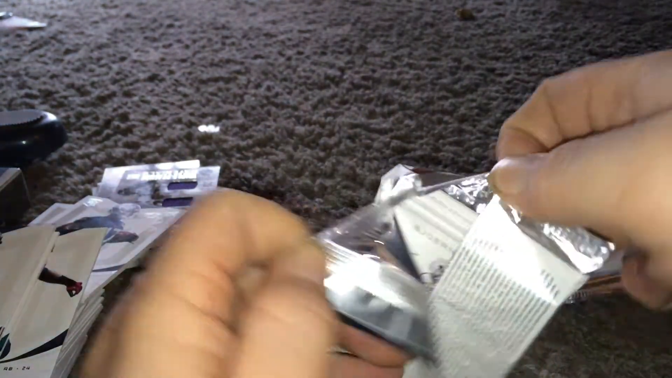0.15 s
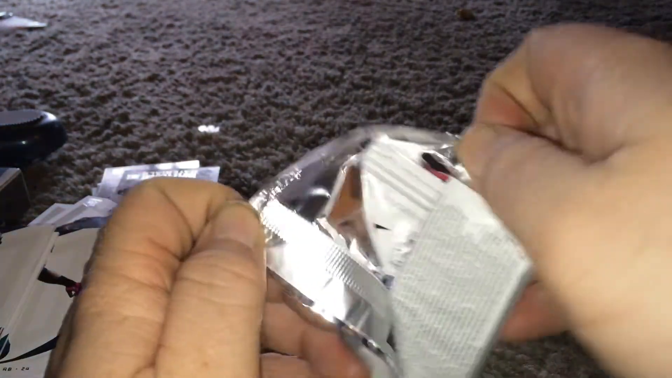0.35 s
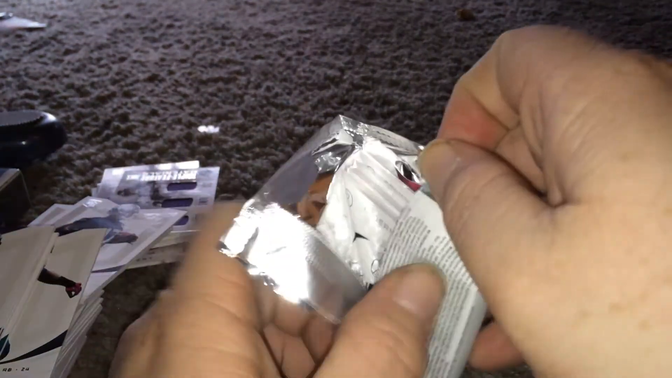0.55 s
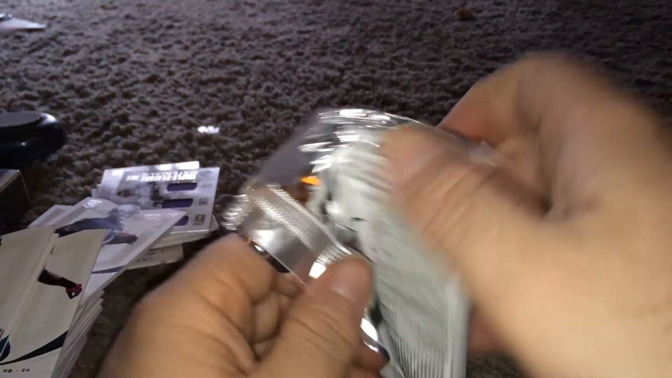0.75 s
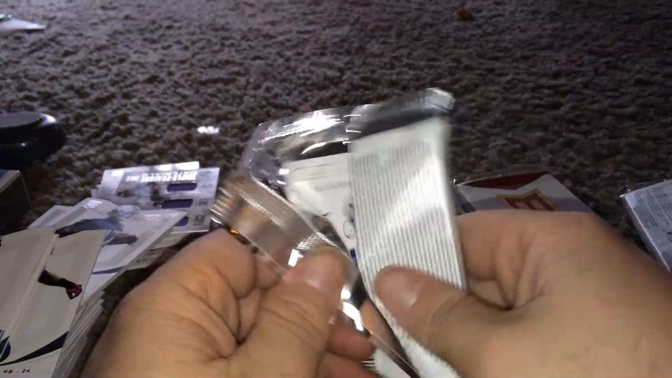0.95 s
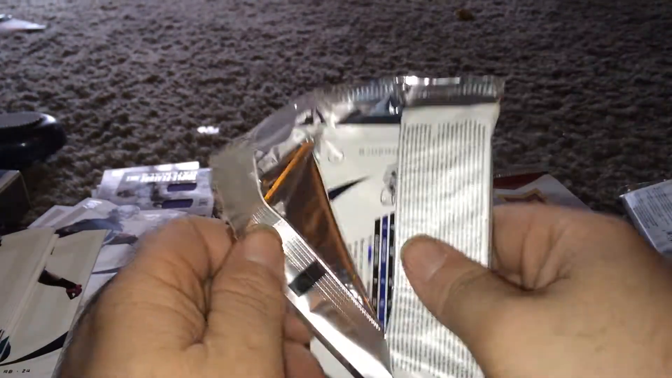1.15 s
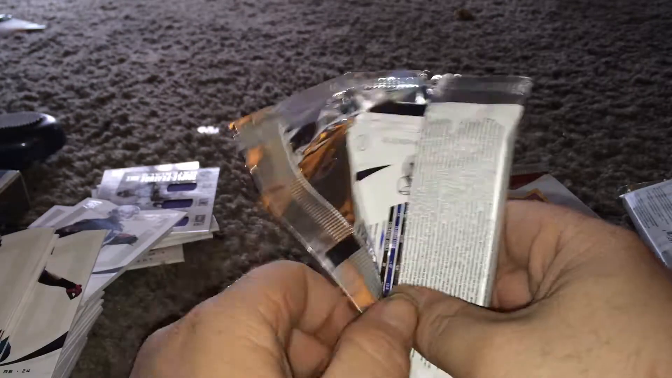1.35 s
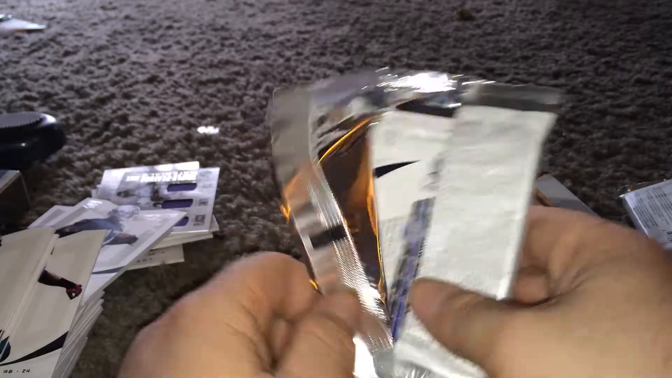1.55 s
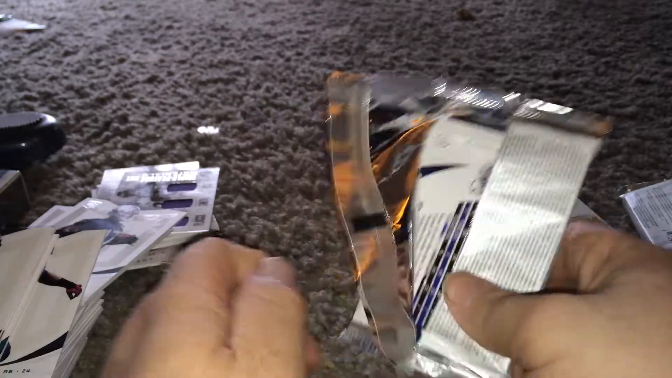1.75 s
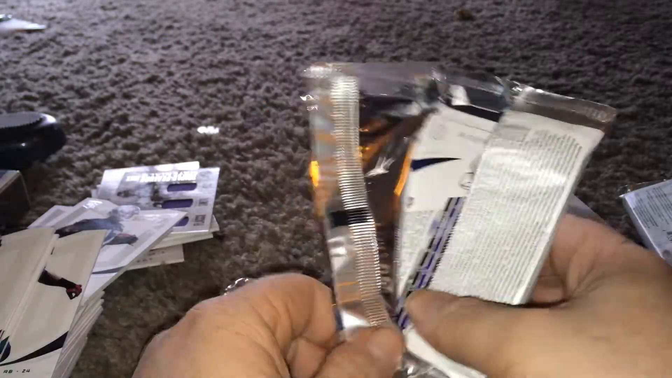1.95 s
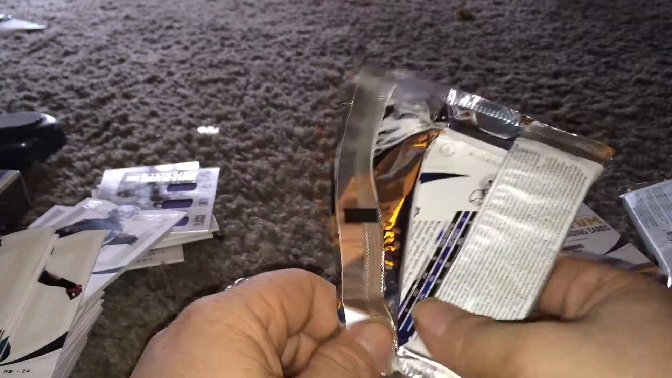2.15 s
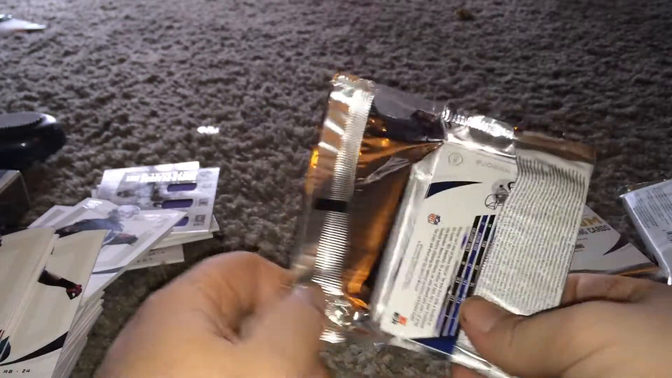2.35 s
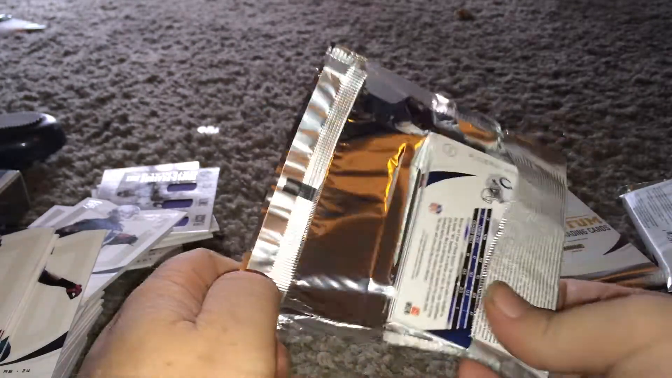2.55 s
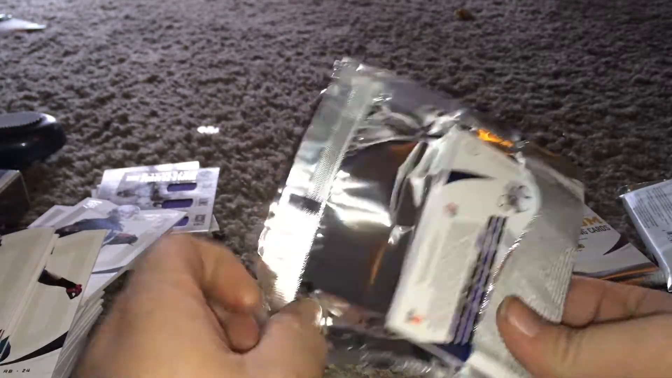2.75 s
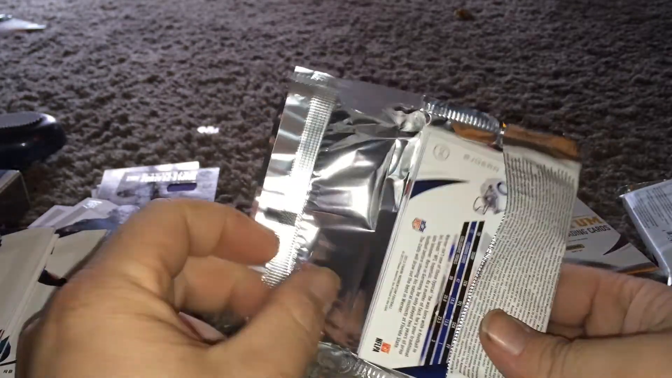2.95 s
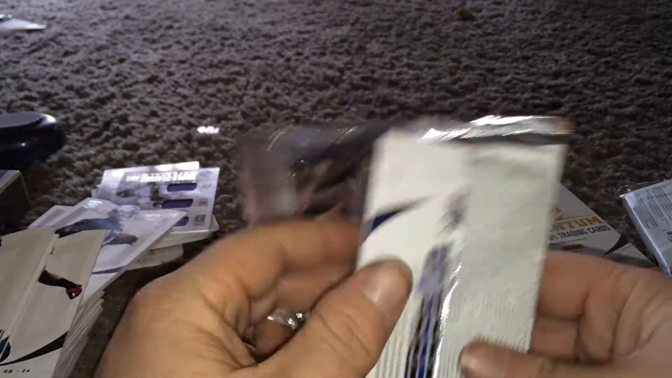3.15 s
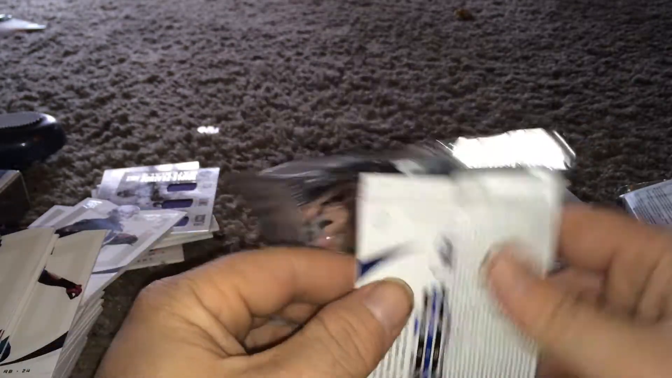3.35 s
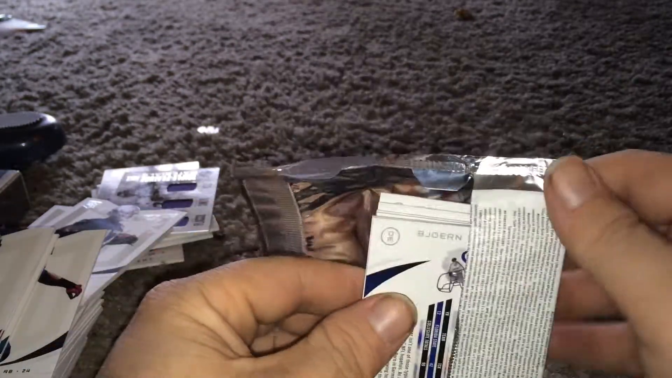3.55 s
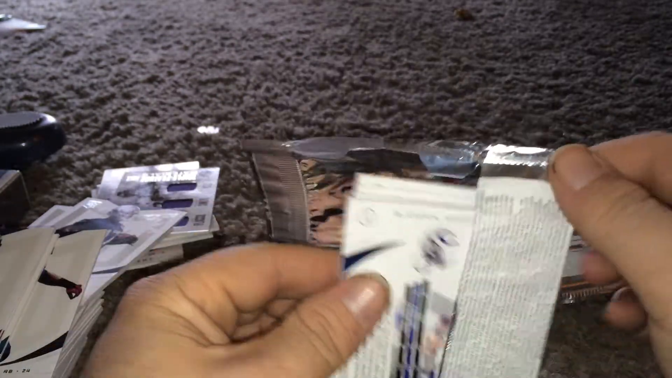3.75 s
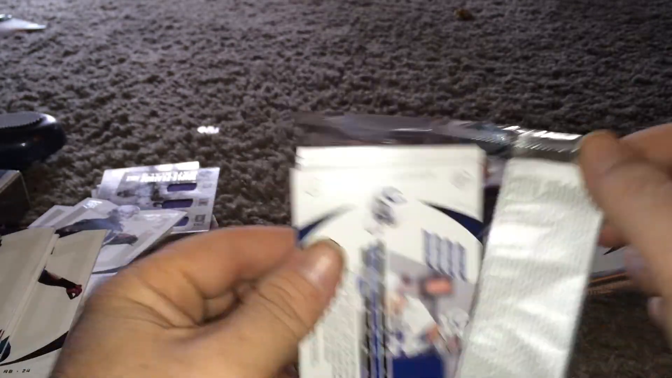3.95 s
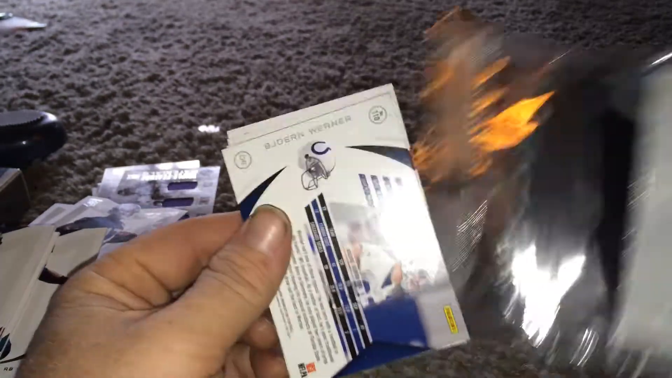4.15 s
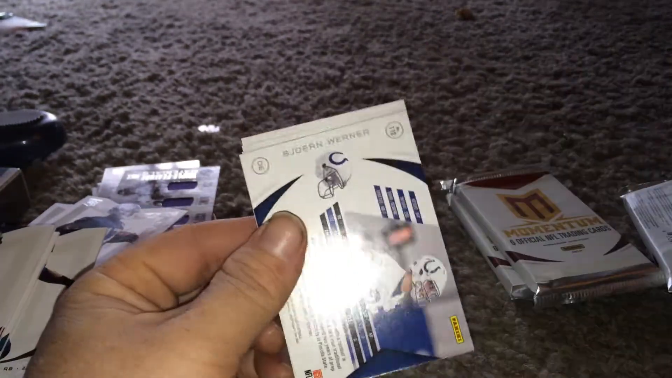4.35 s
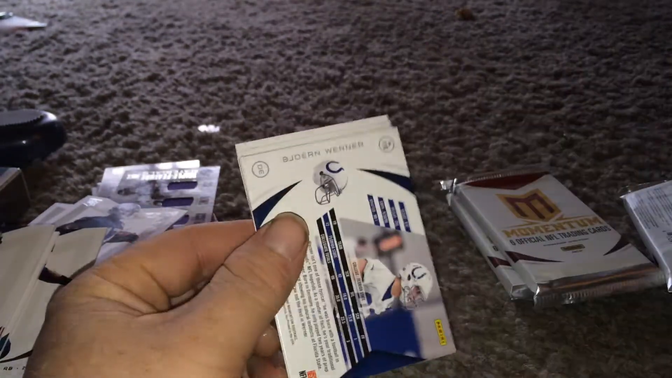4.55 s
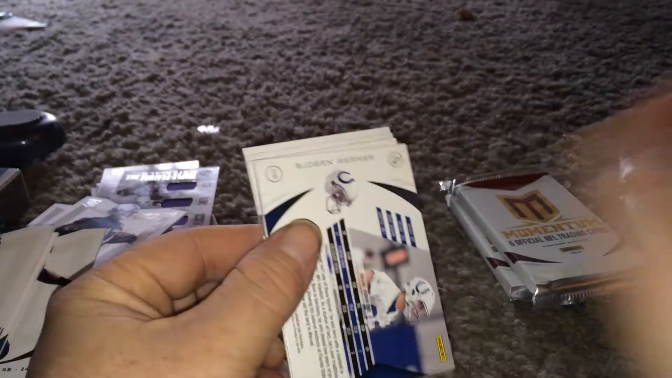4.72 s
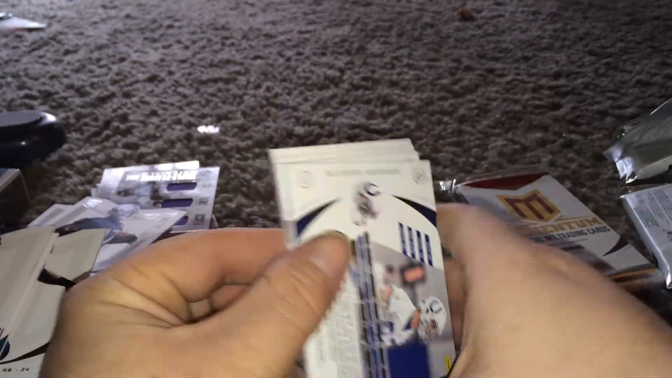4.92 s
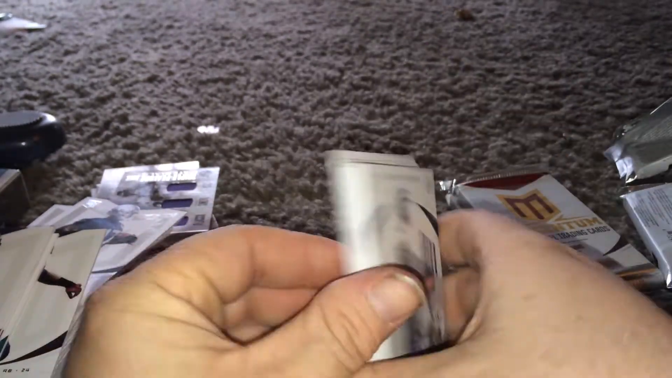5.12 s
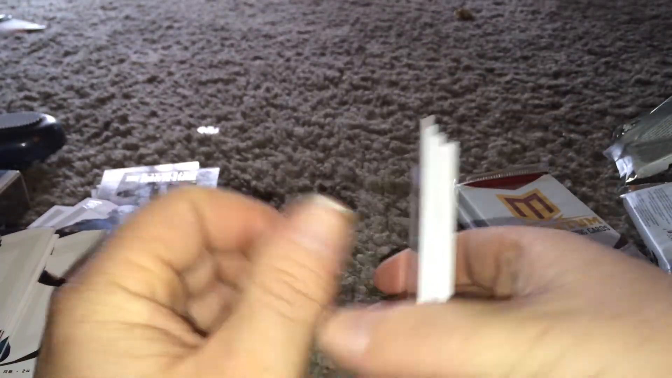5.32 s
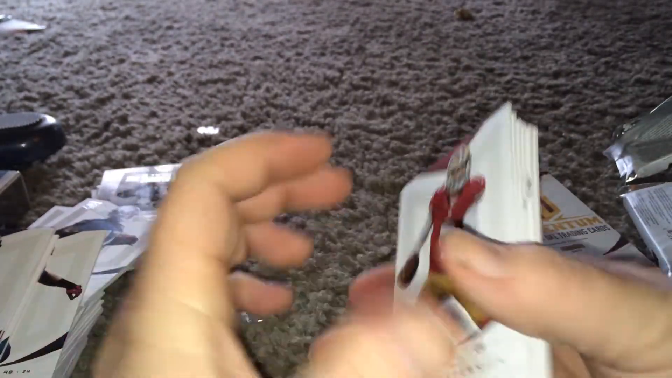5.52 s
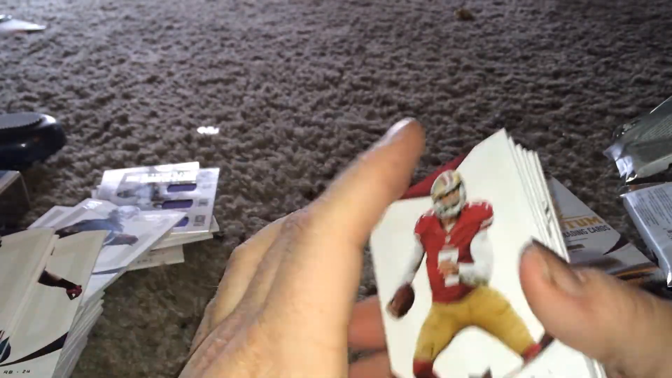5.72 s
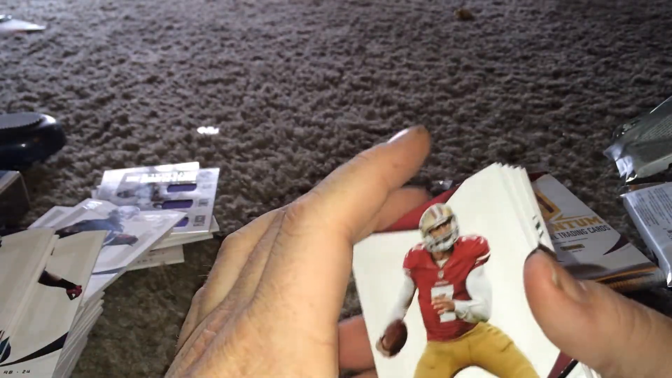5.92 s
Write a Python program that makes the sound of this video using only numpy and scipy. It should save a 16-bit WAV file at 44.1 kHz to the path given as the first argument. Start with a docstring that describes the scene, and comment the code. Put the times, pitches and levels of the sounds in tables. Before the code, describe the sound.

Crisp foil wrapper crackles and pops in busy bursts under working fingers, with one dull knock, then faint card sliding and a soft tap.

```python
"""In a quiet carpeted room, a foil card pack is peeled open along its seam by hand, close to the microphone.
Creases snap through one by one: short noise bursts ring the facet, the sheet and the sharp ridge.
Under them tiny folds crackle and surfaces hiss, shaped by strokes of the fingers; the sheet puffs air.
A dull knock falls midway; later the cards slide with a soft hiss and tap once. Knock and tap are fading tones.
Air noise, a low rumble and a wavering hum lie beneath; a short diffuse echo follows the hands."""
import sys
import numpy as np
from scipy import signal
from scipy.fft import rfft, irfft
from scipy.io import wavfile
from scipy.ndimage import uniform_filter1d

SR = 44100
rng = np.random.default_rng(int(sys.argv[2]) if len(sys.argv) > 2 else 0)


def bounce(signal):
    """Save signal as a 16-bit WAV file at the path given by the first command-line argument."""
    frames = np.transpose(np.atleast_2d(signal))
    limited = np.clip(frames, -1, 1)
    pcm = np.round(limited * 32767).astype(np.int16)
    wavfile.write(sys.argv[1], SR, pcm)


N = 268128

# spectrum of the room's air noise: (frequency [Hz], relative density [dB per Hz])
AIR_SPECTRUM = [(15, -56.5), (25, -25), (59, -1.5), (172, -2), (219, -3.5), (301, -0.5), (354, -22),
                (427, -16.5), (691, -18), (749, -18), (978, -18.5), (1420, -19), (2240, -25), (7090, -36.5),
                (15000, -35.5)]
# low resonances in the steady rumble: (frequency [Hz], width [Hz], relative level [dB])
RUMBLE_MODES = [(91, 30, -10.5), (156.5, 13.5, 3), (236, 12, -1.5), (322.6, 26, -3.5)]
AIR_DB, RUMBLE_DB = -54.5, -59  # RMS

# a low hum in the room that swells and fades: (time [s], level [dB])
HUM_LEVEL = [(0, -54), (.3, -55), (.6, -65), (.9, -49), (1.2, -51), (1.4, -59.5), (1.9, -55.5), (3.0, -59),
             (3.5, -55.5), (4.2, -58), (4.6, -57.5), (5.2, -59), (6.08, -56.5)]
# its tones: (centre frequency [Hz], relative level [dB])
HUM_TONES = [(169.3, 0), (94, -9)]

# strokes of the fingers on the foil, then on the cards, before the layer trims: (strongest time [s],
# swell [s], ease [s], rustle level [dB], sheet flex against rustle [dB], sharp crack against rustle [dB])
STROKES = [(0.0, 0.027, 0.013, -34, -20, 1), (0.131, 0.085, 0.0058, -36, -15, -8),
           (0.283, 0.075, 0.04, -28, -11, -4.5), (0.419, 0.036, 0.015, -39.5, -9, -8),
           (0.49, 0.05, 0.15, -47.5, -3.5, -2), (0.705, 0.064, 0.024, -33, -7, -2.5),
           (0.788, 0.065, 0.035, -39.5, -6.5, -5.5), (1.0, 0.044, 0.072, -38.5, -12, -2),
           (1.193, 0.12, 0.02, -26, -6, -1), (1.295, 0.022, 0.02, -45, -10, -4),
           (1.415, 0.091, 0.011, -44, -20, -1.5), (1.563, 0.074, 0.035, -47.5, 2, -5),
           (1.631, 0.028, 0.077, -29.5, -11, -4.5), (1.743, 0.17, 0.0042, -37.5, -3.5, -8),
           (2.021, 0.042, 0.023, -37, -10, -2), (2.147, 0.047, 0.092, -52.5, 5.5, -3),
           (2.346, 0.089, 0.029, -31.5, -12, -4.5), (2.501, 0.076, 0.032, -35.5, -0.5, -4.5),
           (2.56, 0.0086, 0.029, -37.5, 0, -12), (2.686, 0.071, 0.021, -45.5, 0, -14),
           (2.797, 0.035, 0.065, -39, -9, -3.5), (2.969, 0.099, 0.008, -40.5, -20, -1.5),
           (3.052, 0.035, 0.052, -38, -7, -5.5), (3.118, 0.015, 0.042, -34.5, -12, -6.5),
           (3.231, 0.034, 0.037, -43.5, -2, -3), (3.348, 0.02, 0.027, -43, -5.5, -4),
           (3.469, 0.015, 0.015, -45, -2, -3), (3.615, 0.17, 0.025, -44, -14, -1),
           (3.737, 0.041, 0.03, -45, -17, -5.5), (3.84, 0.011, 0.072, -48, -13, -5),
           (4.01, 0.065, 0.04, -48.5, -8, -3.5), (4.057, 0.008, 0.023, -36, -7.5, -9),
           (4.134, 0.012, 0.022, -54, 10, -21), (4.192, 0.016, 0.008, -43, 4, -1),
           (4.253, 0.034, 0.02, -45, -20, -6.5), (4.475, 0.012, 0.037, -41.5, -10, -5.5),
           (4.57, 0.028, 0.017, -54, -3, -6), (4.62, 0.27, 0.28, -61, -14, 1),
           (4.738, 0.015, 0.01, -55, -9, -1), (4.794, 0.0074, 0.077, -57.5, -0.5, -22.5),
           (5.213, 0.023, 0.039, -55, 0, -0.5), (5.842, 0.052, 0.039, -64, -8.5, -5),
           (5.925, 0.015, 0.047, -57, -5, -4), (6.064, 0.012, 0.025, -62, -1.5, -7)]
STROKE_ROUNDNESS = 2.04  # 2 = a bell curve, 1 = a peak
# faint rustle of the wrapper while merely held, before the layer trims: (time [s], level [dB])
HELD_RUSTLE = [(0, -55), (.6, -63), (.9, -58), (1.45, -55), (1.82, -62.5), (2.3, -53), (3.3, -58),
               (4.5, -57.5), (5.0, -74.5), (6.08, -73)]
HELD_FLEX_DB, HELD_CRACK_DB = -7, -5.5  # against the held rustle
# smooth sliding against the folds: (time [s], level [dB])
SLIDING = [(0, -36), (.7, -10), (1.1, -9), (1.65, -5), (2.0, 7), (2.35, -15), (3.1, -7), (3.5, -1),
           (4.3, -2.5), (6.08, 7.5)]
# the slack wrapper rings hollow once it is open: (time [s], level against the rustle [dB])
HOLLOW_LEVEL = [(0, -26.5), (1.7, -19), (2.4, -7.5), (3.1, -10.5), (3.5, -24), (4.15, -7), (4.6, -16),
                (5.0, -19.5)]
HOLLOW_HZ, HOLLOW_WIDTH_HZ = 1372, 1520
# harder work sets off more folds: rate at a middling level, and its dB of growth per dB of level
FOLDS_PER_S, MIDDLING_DB, FOLD_GROWTH = 1500, -46.5, .3
# ridges that flip: how many folds go to one flip, and its boost
FOLDS_PER_FLIP, FLIP_DB = 28, 10

# creases snapping through; flex and crack are against the snap, before the layer trims: (time [s],
# reference level over 3 ms [dB], facet pitch [Hz], sheet flex [dB], sharp crack [dB])
CREASES = [(0.0318, -29.5, 2020, -30, -16), (0.064, -37, 5000, -27, -3), (0.069, -31, 4030, -11, 2),
           (0.083, -45, 3800, -13, 2), (0.0907, -28, 3900, -23.5, -4), (0.1126, -33, 2080, -11, -14),
           (0.125, -16, 4240, -18, -5), (0.1336, -15.5, 7070, -43, -14), (0.1897, -41, 4100, -28, 0),
           (0.2633, -22, 5800, -15, -1), (0.2685, -26.5, 4000, -9.5, -15), (0.2794, -30, 6300, -13, 1),
           (0.2897, -35, 7260, -22, 11), (0.3097, -26.5, 4730, -2.5, 4), (0.3192, -28.5, 2380, -3.5, -18),
           (0.3428, -39, 3420, -22, -2), (0.3919, -28, 5700, -18, -0.5), (0.4004, -35, 3500, -6, -6),
           (0.4265, -29.5, 7300, -30, 1), (0.4532, -15.5, 4580, -14.5, -4), (0.4603, -24.5, 3400, -18, 0),
           (0.4708, -31, 3870, -19, 1), (0.5152, -41, 3820, -21, -8), (0.5578, -31.5, 2230, -14, -3),
           (0.5613, -30.5, 3800, -14, -2.5), (0.5664, -31, 3930, -24, -19), (0.5807, -35, 4830, -16, -3),
           (0.6584, -27, 1980, -33, -5), (0.6971, -25.5, 5130, -4.5, -12), (0.701, -29, 5670, -12, 1),
           (0.717, -19, 3160, -18.5, -20), (0.7763, -24, 5000, -22, -7.5), (0.792, -36, 3000, -7, -4),
           (0.8224, -29.5, 3840, -12, -7), (0.9503, -41.5, 5660, -12, -2), (0.995, -22, 5900, -21, -3),
           (1.0264, -25, 3900, -30, 5), (1.0546, -22.5, 5000, -32, -8), (1.0599, -26, 7000, -32, -8),
           (1.0654, -17.5, 6860, -39, -6), (1.0709, -25.5, 4900, -39, 2.5), (1.1039, -23.5, 6000, -16, 5.5),
           (1.1286, -20, 6600, -9.5, 2), (1.151, -22, 1670, -6.5, -4), (1.1649, -16, 6540, -16, 0.5),
           (1.183, -32, 6140, -23, -5), (1.1928, -29.5, 6600, -24.5, -8), (1.2034, -26, 6430, -24, -1),
           (1.2104, -21, 5960, -25, 3.5), (1.2176, -14, 5970, -24, -3), (1.2315, -33, 5400, -28, 2),
           (1.2625, -33.5, 4570, -6.5, -2), (1.2947, -25, 7460, -24, 2), (1.3055, -32, 4650, -13, -6),
           (1.3504, -48.5, 3920, 2, -4), (1.368, -39.5, 5500, -19.5, -2), (1.3837, -32.5, 4550, -31, -8),
           (1.4219, -23.5, 4800, -35, -6), (1.4354, -29, 3500, -29, -5), (1.5365, -18, 6600, -24, -6),
           (1.543, -29, 4130, -28, -2), (1.5507, -20.5, 4800, -8.5, -4), (1.5741, -28.5, 2900, -5, -5),
           (1.579, -38.5, 5500, -24, -14), (1.604, -23.5, 5600, -4, 3), (1.6103, -20, 7300, -22, 0.5),
           (1.6234, -25, 4400, -34, -1), (1.6418, -14.5, 6000, -25, -5), (1.6769, -28, 6800, -3, -8),
           (1.6814, -22.5, 2070, -5.5, -8), (1.6983, -22.5, 5300, -26, -7.5),
           (1.7385, -32.5, 3180, -3.5, -8), (1.7431, -25.5, 5900, -11, -2), (1.799, -50, 2000, -10, -2),
           (1.9232, -49.5, 1800, -2.5, -2), (1.954, -27, 4460, -15, 2), (1.96, -30.5, 5200, -11.5, 2),
           (1.9645, -23, 6200, -33, -11), (1.9721, -35.5, 4500, -6, -12), (1.9825, -16.5, 5350, -37, -3.5),
           (1.9906, -30.5, 1980, -9, -17), (2.1592, -41, 4300, -12.5, -18), (2.1822, -35, 3130, -30, -14),
           (2.2078, -30, 4700, -31, 1), (2.2382, -30.5, 4600, -29, 7), (2.2424, -41, 6260, -34, 4),
           (2.286, -20.5, 5200, -19.5, 3), (2.2907, -20, 5750, -24, -7), (2.2964, -42, 2330, -5, -12),
           (2.302, -16.5, 6600, -14.5, -4), (2.3101, -29, 4600, -32, -2), (2.3194, -32, 3400, -21, -4),
           (2.3418, -36, 3300, 2, -11), (2.361, -29, 3800, -20, 3), (2.3725, -29, 2310, -6, 4),
           (2.3859, -30.5, 2730, -23, 11.5), (2.4041, -33, 1660, -13, -17), (2.434, -21.5, 5070, -26, 1),
           (2.4954, -19, 4540, -24, -0.5), (2.5009, -28.5, 3870, -2, 8), (2.5111, -33.5, 1720, -10, 6),
           (2.5229, -35.5, 2860, -1, 1), (2.5604, -34, 3300, -23, 5.5), (2.5761, -31.5, 2660, -12, 0),
           (2.586, -24, 2520, -11, -5), (2.6169, -29.5, 2280, -7.5, -10), (2.6379, -36, 5670, -1, -17),
           (2.6435, -39, 2000, 0, 3), (2.6804, -26, 1760, -7.5, -2.5), (2.6962, -31, 2760, -9, -18),
           (2.721, -32, 5200, -18, -3), (2.77, -30, 5700, -5, -2), (2.7958, -27.5, 5400, -26, -5),
           (2.8297, -23.5, 6800, -23, -1.5), (2.8792, -36.5, 3200, -9, -9), (2.9079, -29.5, 5150, -30, 0),
           (2.9175, -27, 2300, -5.5, -4), (2.962, -39, 3100, 2, 5), (3.0095, -23, 4200, -13, -1.5),
           (3.033, -30, 2860, -28, -5), (3.055, -21.5, 4070, -22, -7), (3.0844, -36, 2400, 1, -9),
           (3.1198, -27, 2350, -11.5, -7), (3.1302, -27, 5760, -31, -6), (3.147, -29, 2370, -18, -3.5),
           (3.173, -36, 2630, -11.5, 3), (3.2221, -28, 3950, -12, 1.5), (3.2656, -35.5, 5850, -35, -16),
           (3.3616, -34, 6500, -33, -18), (3.5242, -28.5, 5450, -31, -8), (3.5342, -30, 2310, -12, -5.5),
           (3.5419, -32.5, 4640, -29, -4), (3.5929, -36.5, 2090, -14, -17), (3.6143, -19, 5800, -49, -7),
           (3.6248, -30, 4570, -30, -2), (3.6298, -24.5, 6400, -21, 0), (3.6556, -27.5, 5400, -40, -8),
           (3.7377, -40.5, 3300, -13, -16), (3.7493, -46, 4040, -2.5, -11), (3.837, -30.5, 5050, -28, -8.5),
           (3.876, -36, 1940, -31, -8), (3.9505, -32.5, 5700, -37, -13), (3.9787, -33.5, 2100, -17, -4),
           (4.0527, -35.5, 3470, -7, 3.5), (4.0842, -44, 3300, -8, 1), (4.102, -35.5, 2310, -8.5, -23),
           (4.1341, -33, 2430, -11.5, -18), (4.283, -46, 2950, -22, -14), (4.4179, -35, 3750, -10.5, -5),
           (4.4483, -34, 6700, -40, -6)]
SNAP_WINDOW_S = .003
# broad resonances of the whole wrapper as it flexes: (frequency [Hz], width [Hz], level [dB])
SHEET_MODES = [(182, 120, -3), (288, 61, 1.5), (580, 180, 0), (901, 168, 0), (1477, 990, -3.5)]
# the creak before a snap, against the buckle, and its rise
STRAIN_DB, STRAIN_S = -17, .0009
RELEASE_DB = -2  # the sharp release, against the run of slips
# decay of a middling buckle, and its spread from crease to crease
BUCKLE_S, BUCKLE_SPREAD_OCTAVES = 0.00088, 1
# a buckle that moves more of the sheet takes longer: middling flex [dB], dB of length per dB of flex
MIDDLING_FLEX_DB, BUCKLE_GROWTH = -16, 0.19

# air pushed at the microphone as the sheet flaps: (time [s], level [dB])
PUFFS = [(0.304, -45), (1.152, -68), (1.742, -44.5), (2.494, -40.5), (2.68, -59), (3.086, -49)]

# dull knocks of the hand: (time [s], level [dB])
KNOCKS = [(2.1000, -15.5)]
# what a knock rings with: (frequency [Hz], relative level [dB], t60 [s])
KNOCK_MODES = [(168.5, -0.5, .1), (290, -4.5, 0.074), (333, -14.5, .06), (705, -26.5, .06)]
# the cards are squared against the palm: (time [s], level [dB], pitch [Hz], t60 [s])
CARD_TAPS = [(5.208, -42.5, 694, 0.047)]
CONTACT_S = .004  # softness of both blows

# colour of the room's echo: (frequency [Hz], relative level [dB])
ECHO_COLOUR = [(100, 21), (500, 8), (1400, -1), (3000, 1), (7000, -1), (15000, -1.5)]
# t60 at the lowest pitches before the treble loss, and total echo energy
ROOM_T60_S, ECHO_DB = 0.1, -17.5

# response of the microphone: (frequency [Hz], gain [dB])
MICROPHONE = [(100, -3), (1500, 2), (2400, -1), (4000, 0), (9500, 1.5), (12500, -6.5), (15500, -6.5)]
CUTOFF_HZ = 15500


def from_db(db):
    """Decibels to an amplitude factor."""
    return 10 ** (np.asarray(db) / 20)


def rms_one(x):
    """Scale to an RMS of 1."""
    return x / np.sqrt(np.mean(x ** 2) + 1e-20)


def energy_one(x):
    """Scale to a total energy of 1."""
    return x / np.sqrt(np.sum(x ** 2) + 1e-20)


def in_time(rows):
    """Draw each column of a curve out sample by sample."""
    s, *columns = np.transpose(rows)
    return [np.interp(np.arange(N) / SR, s, c) for c in columns]


def add(out, s, sound):
    """Mix a sound in at its moment."""
    at = max(round(s * SR), 0)
    out[at:at + len(sound)] += sound[:N - at]


def band(x, low_hz, high_hz):
    """Keep one band of pitches."""
    edges = [low_hz, min(high_hz, .45 * SR)]
    return signal.sosfilt(signal.butter(2, edges, "band", fs=SR, output="sos"), x)


def resonate(x, hz, width_hz):
    """Ring one resonance, with a gain of about 1 at its peak."""
    r = np.exp(-np.pi * width_hz / SR)
    zeros = np.array([1, 0, -1]) * (1 - r * r) / 2
    poles = [1, -2 * r * np.cos(2 * np.pi * hz / SR), r * r]
    return signal.lfilter(zeros, poles, x + 1e-18)


def body(x, modes):
    """Ring resonances in parallel, signs alternating."""
    return sum((-1) ** k * from_db(db) * resonate(x, hz, width)
               for k, (hz, width, db) in enumerate(modes))


def colour(x, spectrum):
    """Shape a sound with a smooth spectrum."""
    hz, db = np.transpose(spectrum)
    freqs = np.maximum(np.fft.rfftfreq(len(x), 1 / SR), 1)
    gain = from_db(np.interp(np.log(freqs), np.log(hz), db))
    return irfft(rfft(x) * gain, len(x))


def drift(rate):
    """Wander by chance with an RMS of 1, turning about `rate` times a second."""
    knots = rng.standard_normal(N // 20)
    return rms_one(np.interp(np.arange(N) * rate / SR, np.arange(len(knots)), knots))


def even(x, size=1500):
    """Take out the slow swings of level and leave the grain."""
    power = uniform_filter1d(uniform_filter1d(x ** 2, size), size)
    return x / np.sqrt(power + 1e-12)


def room_tone():
    """Faint steady air noise over noise-fed low resonances."""
    air, low = rng.standard_normal((2, N))
    air = from_db(AIR_DB) * rms_one(colour(air, AIR_SPECTRUM))
    rumble = from_db(RUMBLE_DB) * rms_one(band(body(low, RUMBLE_MODES), 60, 400))
    return air + rumble


def hum(waver_hz=4, waver_db=0.5):
    """Low tones whose pitch and level wander by chance."""
    level_db, = in_time(HUM_LEVEL)
    tones = np.zeros(N)
    for hz, db in HUM_TONES:
        loudness = from_db(db + waver_db * drift(9))
        phase = 2 * np.pi * np.cumsum(hz + waver_hz * drift(8)) / SR
        tones += loudness * np.sin(phase)
    return from_db(level_db) * rms_one(tones)


def handling():
    """Strokes swell and ease off, driving the rustle, the sheet's flex and the sharp crack."""
    t = np.arange(N) / SR
    held_db, = in_time(HELD_RUSTLE)
    power = np.outer(from_db([0, HELD_FLEX_DB, HELD_CRACK_DB]), from_db(held_db)) ** 2
    for s, swell_s, ease_s, db, flex_db, crack_db in STROKES:
        near = slice(*np.searchsorted(t, [s - 3 * swell_s, s + 3 * ease_s]))
        side_s = np.where(t[near] < s, swell_s, ease_s)
        bell = np.exp(-np.abs((t[near] - s) / side_s) ** STROKE_ROUNDNESS)
        power[:, near] += np.outer(from_db([db, db + flex_db, db + crack_db]), bell) ** 2
    return np.sqrt(power)


def rustle(size_db=2.0, clump_db=3.5, clumps_per_s=200, facet_width=0.067,
           mid_db=-2.58, flex_db=-1.5, crack_db=2.0):
    """Tiny folds give way in clumps, each ringing one of 14 facets, over the hiss of sliding surfaces."""
    level, flex, crack = handling()
    slide_db, = in_time(SLIDING)
    per_s = FOLDS_PER_S * (level / from_db(MIDDLING_DB)) ** FOLD_GROWTH
    clumps = from_db(clump_db * drift(clumps_per_s))

    born = rng.random(N) < per_s * clumps / SR
    sizes = from_db(size_db * np.minimum(rng.exponential(1, N), 4))
    folds = born * clumps * sizes * rng.choice([-1, 1], N)
    dealt = rng.integers(0, 14, N)
    pitches = np.geomspace(2200, 7600, num=14)
    facets = sum(resonate(folds * (dealt == k), hz, facet_width * hz) for k, hz in enumerate(pitches))

    # the sliding catches and eases with the same clumps
    slide = even(np.sqrt(clumps) * rng.standard_normal(N))
    # now and then a whole ridge flips with a sharp, broad tick
    flipped = rng.random(N) < per_s / FOLDS_PER_FLIP / SR
    flips = flipped * rng.standard_normal(N) * from_db(FLIP_DB) * np.sqrt(SR / per_s)
    drive = even(folds) + from_db(slide_db) * slide + flips

    crackle = even(band(facets, 970, 9800))
    hiss = rms_one(band(slide, 2600, 7200)) * from_db(slide_db)
    mid = even(crackle + hiss + 2 * band(flips, 2370, 5600))
    sheet = even(body(drive, SHEET_MODES))
    ridges = even(resonate(band(drive, 7800, 17000), 9500, 6000))
    hollow_db, = in_time(HOLLOW_LEVEL)
    cavity = resonate(resonate(drive, HOLLOW_HZ, HOLLOW_WIDTH_HZ), HOLLOW_HZ, HOLLOW_WIDTH_HZ)
    hollow = from_db(hollow_db) * even(cavity)

    near = level * (from_db(mid_db) * mid + hollow)
    return near + flex * from_db(flex_db) * sheet + crack * from_db(crack_db) * ridges


def snaps(rise_s=0.0002, facet_width=0.39, facet_db=-3, pane_db=-3.5, pane_width=0.079,
          spread_db=-6.0, flex_db=5.0, crack_db=4.3, flutter_db=-23, flutter_s=0.0032):
    """A crease strains, then buckles in a run of slips: its facet rings, the sheet flexes, the ridge cracks."""
    out, t = np.zeros(N), np.arange(-192, 832) / SR
    before, after = np.minimum(t, 0), np.maximum(t, 0)
    panes = rng.uniform(-0.94, 1, (len(CREASES), 3))
    chances = rng.standard_normal((len(CREASES), 3, len(t)))
    stretches = 2 ** (BUCKLE_SPREAD_OCTAVES * rng.standard_normal(len(CREASES)))
    for (s, db, hz, flex, crack), stretch, chance, octaves in zip(CREASES, stretches, chances, panes):
        length = BUCKLE_S * stretch * from_db(BUCKLE_GROWTH * (flex - MIDDLING_FLEX_DB))
        buckle = np.exp(before / rise_s - after / length)
        # the film creaks just before the buckle and flutters a little after
        creak = from_db(STRAIN_DB) * np.exp(before / STRAIN_S)
        tremble = from_db(flutter_db) * np.exp(-after / flutter_s)
        flutter = np.where(t < 0, creak, tremble)
        slips, shiver, twang = chance * (buckle + flutter)
        # one sharp release stands out of the run of slips
        release = from_db(RELEASE_DB) * (t == 0)
        slips, shiver = energy_one(slips) + release, energy_one(shiver) + release

        ring = resonate(resonate(shiver, hz, facet_width * hz), hz, 2 * facet_width * hz)
        facet = from_db(facet_db) * energy_one(ring)
        # the taut panes beside the crease give each snap a few narrow tones of its own
        pane_hz = hz * 2 ** (0.79 * octaves)
        tones = from_db(pane_db) * energy_one(sum(resonate(twang, f, pane_width * f) for f in pane_hz))
        neighbours = from_db(spread_db) * energy_one(band(slips, 1720, min(3.7 * hz, 8500)))
        sheet = from_db(flex + flex_db) * energy_one(body(slips, SHEET_MODES))
        sharp = resonate(band(slips, 10000, .45 * SR), 8600, 13000)
        ridge = from_db(crack + crack_db) * energy_one(sharp)
        snap = facet + tones + neighbours + sheet + ridge
        add(out, s + t[0], from_db(db) * np.sqrt(SNAP_WINDOW_S * SR) * snap)
    return out


def puffs(puff_hz=75, swell_s=0.0056):
    """Each flap of the sheet is a brief low swing of pressure."""
    out, t = np.zeros(N), np.arange(SR // 8) / SR
    swing = t / swell_s * np.exp(1 - t / swell_s) * np.sin(2 * np.pi * puff_hz * t)
    for s, db in PUFFS:
        add(out, s - swell_s, from_db(db) * swing)
    return out


def soft_contact(t):
    """A soft blow eases in while the surfaces press together."""
    return (1 - np.exp(-t / CONTACT_S)) ** 2


def knocks():
    """A soft blow sets a few low modes ringing, a dull knock."""
    out, t = np.zeros(N), np.arange(SR // 2) / SR
    ring = sum(from_db(db - 60 * t / t60) * np.sin(2 * np.pi * hz * t) for hz, db, t60 in KNOCK_MODES)
    for s, db in KNOCKS:
        add(out, s, from_db(db) * soft_contact(t) * ring)
    return out


def card_taps():
    """The stack meets the palm with one short, soft-edged tone."""
    out, t = np.zeros(N), np.arange(SR // 2) / SR
    for s, db, hz, t60 in CARD_TAPS:
        add(out, s, from_db(db - 60 * t / t60) * soft_contact(t) * np.sin(2 * np.pi * hz * t))
    return out


def room_echo(x, first_echo_s=0.00057, dull_hz=14000):
    """A diffuse noise tail that builds up within a few milliseconds; the treble dies sooner."""
    t = np.arange(SR // 2) / SR
    noise = colour(rng.standard_normal(len(t)), ECHO_COLOUR)
    tail = np.zeros(len(t))
    for low in 80 * 2. ** np.arange(8):  # octave bands
        tail += band(noise, low, 2 * low) * from_db(-60 * t * (1 + low / dull_hz) / ROOM_T60_S)
    tail = energy_one(tail * (1 - np.exp(-t / first_echo_s)))
    return from_db(ECHO_DB) * signal.fftconvolve(x, tail)[:N]


def scene():
    """Foil, cards and hands close by, the room behind them."""
    hands = snaps() + rustle() + knocks() + card_taps() + puffs()
    return (hands + room_echo(hands) + room_tone() + hum())[None]


def record(dry):
    """The microphone colours the sound, tall peaks are rounded and the top is cut."""
    top = .8  # ceiling of the rounding
    heard = colour(dry[0], MICROPHONE)[None]
    rounded = top * np.tanh(heard / top)
    return signal.sosfilt(signal.ellip(10, .1, 80, CUTOFF_HZ, fs=SR, output="sos"), rounded)


dry = scene()
out = record(dry)
bounce(out)
```